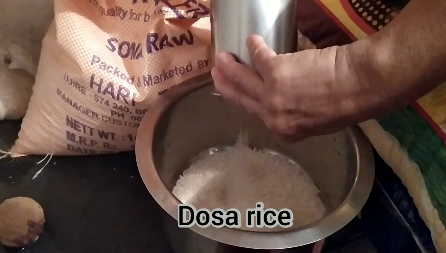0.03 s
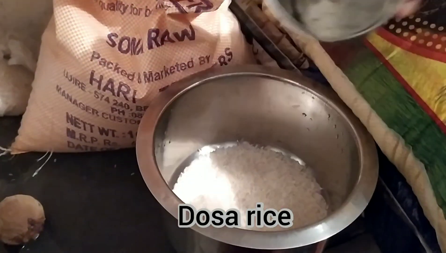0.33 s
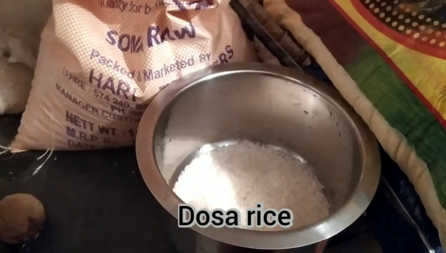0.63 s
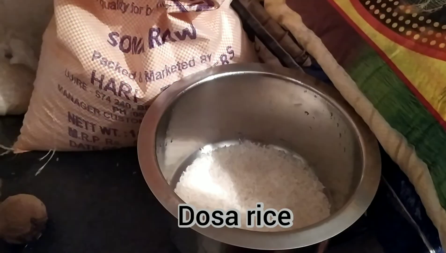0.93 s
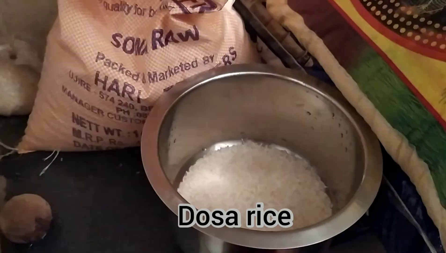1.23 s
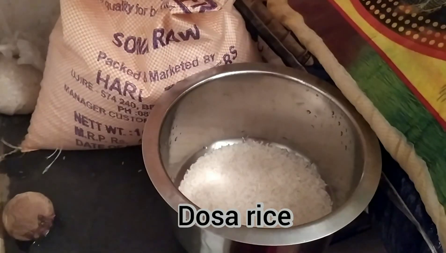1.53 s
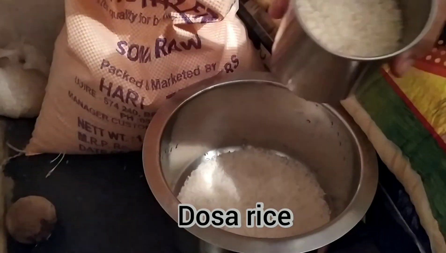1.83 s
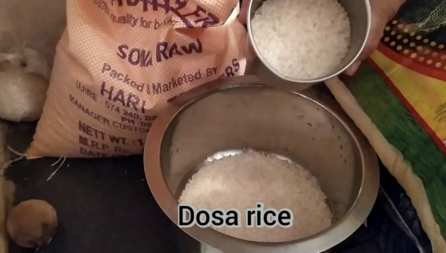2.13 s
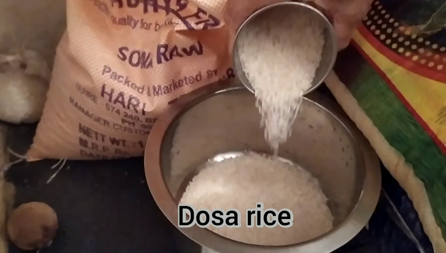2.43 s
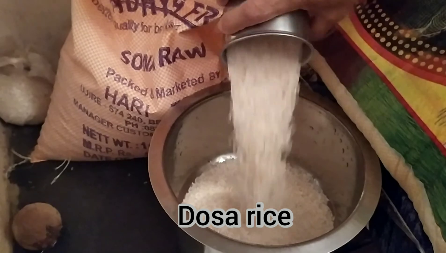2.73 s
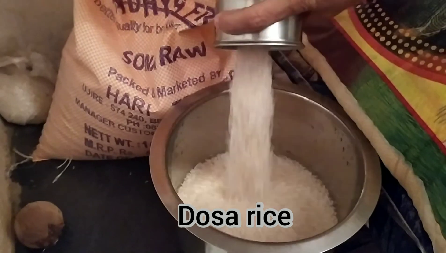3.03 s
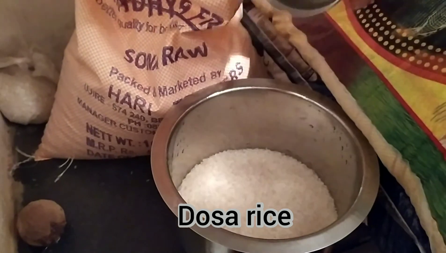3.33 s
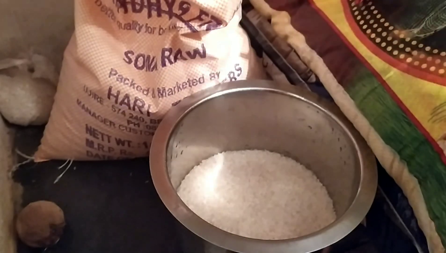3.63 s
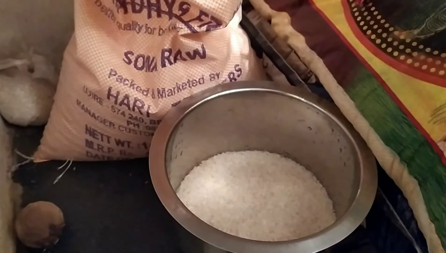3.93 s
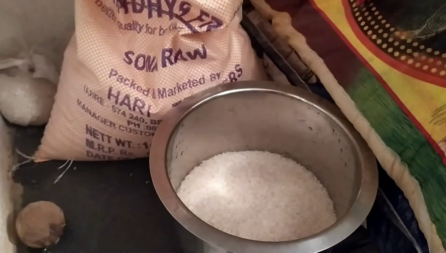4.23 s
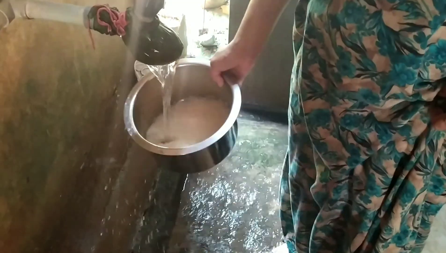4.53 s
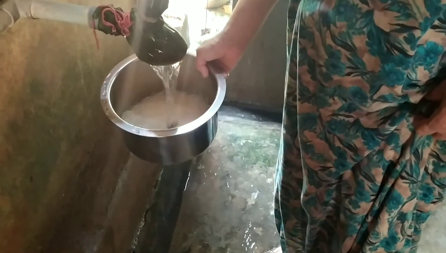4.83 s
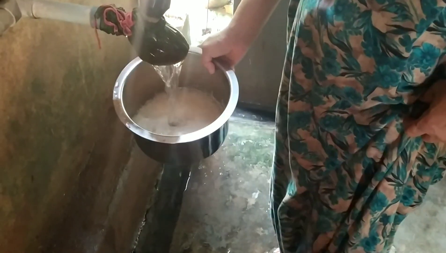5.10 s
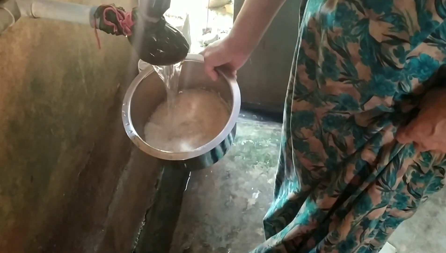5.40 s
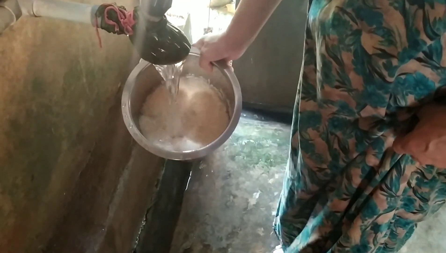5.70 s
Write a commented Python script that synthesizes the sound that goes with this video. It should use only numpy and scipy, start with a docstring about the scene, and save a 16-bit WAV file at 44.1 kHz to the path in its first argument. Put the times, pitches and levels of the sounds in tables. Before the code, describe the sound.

Two cupfuls of dry rice pour into a steel pot between a clank and scoops from a sack, before running water splashes and gurgles in.

```python
"""Rice into a steel pot

A steel cup pours raw rice into a steel pot: grains hiss on the heap and tinkle off the walls.
The cup clanks on the rim, crunches into a woven sack, pours a second cupful and digs again.
Cut to a washing place, where a tap splashes and gurgles onto the rice, about half a metre away."""
import sys
import numpy as np
from scipy import signal
from scipy.fft import rfft, irfft, next_fast_len
from scipy.io import wavfile

SR = 44100
rng = np.random.default_rng(int(sys.argv[2]) if len(sys.argv) > 2 else 0)


def inscribe(sig):
    """Save sig as 16-bit PCM at rate SR to the path in sys.argv[1].

    A 1-D sig is mono; a 2-D sig holds one channel per row.
    Samples are clipped to [-1, 1] before scaling.
    """
    pcm = np.round(np.clip(np.atleast_2d(sig).T, -1, 1) * 32767)
    wavfile.write(sys.argv[1], SR, pcm.astype(np.int16))


N = 258426
T = np.arange(N) / SR
CUT_S = 4.321  # cut to the washing place


# cupfuls: t/s when empty, hiss level/dB, patter level/dB, tinkle level/dB
CUPFULS = [(0.102, -31, -38, -31), (3.201, -30, -42, -23.5)]
# rice sliding in the lifted cup: t/s, rise/s, hold/s, level/dB
CUP_SLIDES = [(1.897, 0.0075, 0.065, -59), (2.185, 0.0093, 0.036, -59), (2.21, 0.048, 0.072, -47.5),
              (2.35, 0.024, 0.092, -54)]
# bright EQ of grains on the heap: f/Hz, level/dB
HISS_EQ = [(1500, -13.5), (3500, -20), (5500, -15), (7200, -1), (9500, 8.5), (12000, 2), (15500, 1)]
# hollow EQ of the pot: f/Hz, level/dB
PATTER_EQ = [(150, 4.5), (330, 0), (490, 8.5), (750, -8), (1300, -5.5), (2000, 2), (2800, 3.5),
             (4200, -13.5), (7000, -7.5), (15000, -79)]
def pour(peak_grains_per_s=7000):
    """Grains hiss on the heap and patter in the hollow pot; a stronger flow means more grains."""
    _, hiss_db, patter_db, _ = np.transpose(CUPFULS)
    flow = rice_flow(hiss_db, lead_s=0.26, arch_db=22.5, fall_db_s=236.5, slump_db=4)
    flow += swells(CUP_SLIDES, fall_db_s=125)
    rate = peak_grains_per_s * (flow / flow.max()) ** 0.66
    hiss = in_pot(colour(grains(rate, spread_db=1.5), HISS_EQ))
    patter = in_pot(colour(grains(rate, spread_db=0.5), PATTER_EQ))
    return hiss * flow + patter * rice_flow(patter_db, lead_s=0.26, arch_db=18.5, fall_db_s=143)


def rice_flow(levels_db, lead_s, arch_db, fall_db_s, slump_db=0, pour_s=.73, slump_s=.3275):
    """Each pour arches to a peak lead_s before the cup is empty, then the last grains settle."""
    gain = 0
    for (empty_s, *_), db in zip(CUPFULS, levels_db):
        t = np.clip(T - empty_s, -pour_s, 1)
        attack = np.minimum((t + pour_s) / 0.023, 1)
        arch = ((np.minimum(t, 0) + lead_s) / (pour_s - lead_s)) ** 2
        packed = 1 - np.clip((t + slump_s) / 0.022, 0, 1)  # falls to 0 as the packed rice lets go
        gain += attack * amp(db - arch_db * arch - slump_db * packed - fall_db_s * np.maximum(t, 0))
    return gain


# steel resonances struck by grains: f/Hz, width/Hz, level/dB
TINKLE_MODES = [(2180, 670, -26.5), (3640, 130, -16.5), (4840, 33, -3.5), (5500, 17, -5), (5930, 90, -10),
                (6260, 120, -6.5), (7040, 135, 1.5), (7430, 160, -0.5), (7735, 140, 3.5), (7970, 190, 2.5),
                (8950, 660, -5)]
# EQ of the fine sparkle on top: f/Hz, level/dB
JINGLE_EQ = [(2000, -16), (3000, -14.5), (4200, -11), (5200, -5), (7800, 9), (9000, -1), (12000, 1)]
def tinkle(jingle_db=-8, shift_db=2.9):
    """Grains bounce off cup and pot; each new landing spot brings out other resonances of the steel."""
    hits = grains(3500, spread_db=-1)
    levels_db = [row[3] for row in CUPFULS]
    flow = rice_flow(levels_db, lead_s=0.23, arch_db=27, fall_db_s=167, slump_db=11)
    flow += swells(CUP_SLIDES, fall_db_s=146) * amp(-1.5)
    ring = sum(amp(db + shift_db * walk(22.09)) * resonate(resonate(hits, hz, width), hz, 5 * width)
               for hz, width, db in TINKLE_MODES)
    sparkle = pings(0, CUPFULS[-1][0] + .4, 2000, 12000, cycles=260, glide=0, spread_db=.8, count=3200)
    jingle = unit(colour(sparkle, JINGLE_EQ))
    return (unit(ring) * amp(-1.3) + jingle * amp(jingle_db)) * flow * amp(1.1 * walk(60))


# ring of pot and cup: f/Hz, level/dB, t60/s, left minus right/dB, lag on the right/ms
STEEL_MODES = [(126, -20, .36, -2, .1), (724, -32, .45, 0, -.37), (949, -17.5, .53, -8, .4),
               (1814, -23.5, .85, -3, .19), (1868, -13, .7, 1, .19), (2289, -27, .36, 7, .3),
               (2422, -25, .35, 2, -.04), (2598, -31, .51, 1, .2), (3494, -17.5, .43, 4, .16),
               (4097, -31, .5, 3, .1), (4510, -21, .28, 4, -.03), (4547, -13.5, .22, 3, -.03),
               (4622, -24, .43, 6, -.04), (5160, -26, .42, 7, .08), (6550, -23, .33, 5, .3),
               (6690, -25, .38, 4, .2), (6860, -30, .45, 1, -.1), (7100, -24, .4, 11, .03),
               (7187, -14, .42, 5, .035), (7385, -21.5, .45, 3, .03), (7490, -25, .35, 4, .1),
               (7610, -18.5, .38, 8, -.015), (7891, -31, .4, 8, .2), (8550, -31, .53, 12, .1),
               (9240, -33, .4, 2, .2), (9410, -26.5, .38, 7, -.01), (11160, -37, .5, 2, .3)]
# chatter on the rim: t/s, ring level/dB, crack level/dB, tilt/(dB per octave)
RIM_HITS = [(0.9051, -1, -2.5, -0.5), (0.9126, -10, -14, 5), (.918, -6, -19, 3.5),
            (0.922, -11.5, -15.5, -3.5), (0.9346, -8, -16, 0), (0.944, -9, -19.5, 7),
            (0.946, -11, -29.5, -4.5)]
# EQ of the steel-on-steel crack: f/Hz, level/dB
CRACK_EQ = [(60, -26.5), (125, 8), (200, -9.5), (450, -3), (900, 2.5), (1400, -4), (2400, 8.5), (3300, -6),
            (4600, 5.5), (5600, -13), (7100, 12), (8200, -6.5), (9400, 4), (10400, -13), (11200, -8),
            (15000, -15)]
def clank(crack_t60=0.12, wash_db=-22.5, wash_t60=0.62, ring_db=-4, build_cycles=2.3):
    """The cup chatters on the rim: each contact cracks and feeds the steel modes. Gives (ring, crack)."""
    ring, t = np.zeros((2, N)), T[:int(.72 * SR)]
    first_s = RIM_HITS[0][0]
    for hz, db, t60, pan_db, lag_ms in STEEL_MODES:
        lag = np.array([[0], [lag_ms / 1000]])
        gain_db = db + ring_db + np.array([[pan_db], [-pan_db]]) / 2
        envelope = np.minimum(t * hz / build_cycles, 1) * decay(t, t60) * amp(gain_db)
        slips, detunes = rng.random(len(RIM_HITS)), rng.standard_normal(len(RIM_HITS))
        for (s, blow_db, _, tilt_db), slip, detune in zip(RIM_HITS, slips, detunes):
            # rebounds detune the high partials and land roughly in step with the ring
            pitch = hz + detune * (hz / 2800) ** 2 * (s > first_s)
            phase = hz * (s - first_s) + .55 * (slip - .5)
            strength = amp(blow_db + tilt_db * np.log2(max(hz, 1500) / 4000))
            add(ring, s, strength * envelope * np.sin(2 * np.pi * (pitch * (t - lag) + phase)))
    # a wash of weak modes lingers behind the cracks
    crowd = sum(np.sin(2 * np.pi * (hz * t + rng.random((2, 1)))) for hz in rng.uniform(2000, 12000, 120))
    wash = np.zeros((2, N))
    add(wash, first_s, crowd)
    wash = unit(colour(wash, CRACK_EQ)) * np.sqrt(len(t) / N) * amp(wash_db) * blow(first_s, wash_t60)
    crack_power = sum((amp(db) * blow(s, crack_t60)) ** 2 for s, _, db, _ in RIM_HITS)
    crack = unit(colour(grains(20000, spread_db=.8), CRACK_EQ))
    return ring, wash + crack * np.sqrt(crack_power)


# cup in the sack: start t/s, end t/s
SCOOP_SPANS = [(0.999, 1.627), (4.123, 4.321)]
# shoves through the rice: t/s, rise/s, hold/s, crunch level/dB, rumble level/dB
CUP_SHOVES = [(0.991, 0.0078, 0.049, -34, -40.5), (1.066, 0.027, 0.055, -42.5, -44.5),
              (1.163, 0.057, 0.028, -37.5, -43), (1.236, 0.014, 0.043, -58, -40),
              (1.29, 0.035, 0.11, -34.5, -39), (1.38, 0.045, 0.04, -33.5, -33),
              (1.472, 0.031, 0.048, -35.5, -37), (1.558, 0.031, 0.0081, -34.5, -33),
              (4.12, 0.0043, 0.026, -37, -41.5), (4.129, 0.037, 0.042, -24.5, -27.5),
              (4.242, 0.027, 0.036, -32.5, -33)]
# grains screeching along the cup on the hardest shoves: t/s, rise/s, hold/s, level/dB
CUP_SCREECHES = [(1.4, 0.055, 0.083, -44), (1.575, 0.012, 0.025, -41), (4.15, 0.011, .01, -35),
                 (4.196, 0.0073, 0.0085, -24)]
# gritty EQ of packed rice: f/Hz, level/dB
CRUNCH_EQ = [(300, -24), (600, 1.5), (900, 9.5), (1300, -0.5), (2500, 4.5), (5000, -3), (7500, 2.5),
             (10000, -3.5), (13000, -15), (15500, -18)]
# low body of the sack: f/Hz, level/dB
RUMBLE_EQ = [(40, -11.5), (90, -5), (150, 2), (300, -3.5), (480, -3.5), (700, -26.5), (1500, -31),
             (6000, -62)]
def dig():
    """Packed grains stick and slip against the cup; the mass of the sack rumbles with each shove."""
    push = swells([row[:4] for row in CUP_SHOVES], fall_db_s=246)
    heave = swells([(s, rise, hold, db) for s, rise, hold, _, db in CUP_SHOVES], fall_db_s=218)
    crunch = in_pot(colour(grains(4500, spread_db=-0.5), CRUNCH_EQ), wet_db=-5, t60=0.081) * amp(0.46)
    rumble = unit(colour(grains(1500, spread_db=-2), RUMBLE_EQ)) * amp(2.55)
    screech = in_pot(colour(grains(5000, spread_db=3), [(5000, -32), (9500, -6), (15000, -15.5)]))
    screech *= swells(CUP_SCREECHES, fall_db_s=248)
    in_sack = sum(during(*span) for span in SCOOP_SPANS)
    return (crunch * push + rumble * heave + screech) * amp(0.96 * walk(110)) * in_sack


# blunt bumps: t/s, crunch level/dB, thud level/dB
CUP_KNOCKS = [(1.05, -28.5, -23), (1.127, -32, -28.5), (1.245, -22, -19.5), (1.524, -27.5, -51),
              (3.836, -57, -48), (4.039, -48.5, -37.5), (4.202, -25, -29)]
def knocks(thud_hz=122, thud_t60=0.18, crunch_t60=0.056):
    """The cup bumps into the rice: a short crunch over a low thud."""
    crunch = unit(colour(grains(9000, spread_db=2.5), CRUNCH_EQ))
    out = np.zeros((2, N))
    for s, crunch_db, thud_db in CUP_KNOCKS:
        thud = np.sin(2 * np.pi * thud_hz * (T - s)) * blow(s, thud_t60, rise=0.0039)
        out += amp(crunch_db) * crunch * blow(s, crunch_t60) + amp(thud_db) * thud
    return out


# EQ of water on wet rice: f/Hz, level/dB
SPLASH_EQ = [(200, -22.5), (800, -27), (1200, -18.5), (2600, -6.5), (3800, -12), (5000, -9.5), (6900, 0),
             (7900, -1), (8800, -3.5), (11300, -6), (13000, -13), (15500, -17)]
# slaps into the pooling water: t/s, rise/s, hold/s, level/dB
WATER_SLAPS = [(4.448, 0.0056, 0.032, -38.5), (4.88, 0.037, 0.18, -57), (5.35, 0.036, 0.12, -57),
               (5.63, 0.0096, 0.27, -53)]
# spurts of droplets: t/s, level/dB
WATER_SPITS = [(4.359, -37), (4.489, -26), (4.67, -34.5), (4.963, -47), (5.152, -43), (5.254, -39.5),
               (5.333, -40.5), (5.494, -38), (5.547, -38.5), (5.558, -38), (5.691, -37.5), (5.717, -35)]
# clusters of big bubbles: t/s, rise/s, hold/s, level/dB
WATER_BURBLES = [(4.59, 0.028, 0.076, -58), (4.85, 0.015, 0.12, -60.5), (5.05, 0.023, 0.018, -59),
                 (5.32, 0.019, 0.14, -54.5), (5.48, .02, 0.15, -59), (5.68, .02, 0.39, -55)]
# solo drops and bubbles: t/s, level/dB, f/Hz, ring/cycles
WATER_DROPS = [(4.3297, -10.5, 8600, 24), (4.34, -11.5, 7400, 24), (4.348, -19, 7950, 54),
               (4.361, -15, 8500, 53), (4.4295, -16.5, 7600, 60), (4.453, -21, 2660, 150),
               (4.467, -29, 3080, 28), (4.495, -25, 2840, 60), (4.783, -27, 6750, 180),
               (5.061, -41, 1530, 74), (5.356, -40, 1030, 35), (5.394, -43, 880, 30),
               (5.634, -46, 1150, 120), (5.78, -41, 1210, 115)]
def tap(splash_db=-45.5, bare_rice_db=14.5, pooling_s=0.43, fizz_db=-56.5, pot_air_hz=1195, glide=0.19):
    """The stream hits bare rice until pooling water cushions it, spitting and whipping up bubbles."""
    slaps = swells(WATER_SLAPS, fall_db_s=145)
    bare = np.exp(-np.maximum(T - CUT_S, 0) / pooling_s)
    splash = np.hypot(amp(splash_db + bare_rice_db * bare), slaps * amp(7))
    droplets = unit(colour(grains(12000, spread_db=2.6), SPLASH_EQ))
    small = pings(CUT_S, T[-1], 4000, 9000, cycles=55, glide=glide, spread_db=3, count=700)
    medium = pings(CUT_S, T[-1], 1900, 3500, cycles=50, glide=glide, spread_db=3, count=450)
    large = pings(CUT_S, T[-1], 900, 1600, cycles=28, glide=glide, spread_db=1.2, count=450)
    large = large * amp(-2.5) + resonate(large, pot_air_hz, 94) * amp(-10)  # the pot's air rings along
    spray = unit(churn(droplets)) * amp(0.77 + 0.19 * walk(42))
    spits = droplets * swells([(s, .002, .003, db) for s, db in WATER_SPITS], fall_db_s=1500)
    fizz = medium * np.hypot(amp(fizz_db), slaps)
    burble = large * swells(WATER_BURBLES, fall_db_s=130)
    out = (spray + small * amp(-12)) * splash + spits + fizz + burble + gurgle()
    for s, db, hz, cycles in WATER_DROPS:
        add(out, s, np.outer([.95, .7], ping(hz, cycles, glide=0.12)) * amp(db))
    return out * during(CUT_S + 0.0056, 6)


def churn(x, depth_db=3, rate=26):
    """The splash crater keeps changing shape, so each narrow band swells on its own; a 2 s loop."""
    size = next_fast_len(2 * SR)
    spectrum, out = rfft(x, size), 0
    position = np.log2(np.clip(np.fft.rfftfreq(size, 1 / SR), 500, 16000) / 500) * 5  # 5 bands an octave
    for band in range(26):
        band_sound = irfft(spectrum * np.maximum(1 - abs(position - band), 0), size)
        out += band_sound * amp(depth_db * walk(rate)[:size])
    return out[:, np.arange(N) % size]


# voice of the hollow that the stream digs: t/s, f/Hz, level/dB
GURGLE_PATH = [(4.33, 340, -62), (4.45, 340, -48), (4.6, 350, -67), (4.72, 510, -59), (4.96, 510, -63),
               (5.02, 505, -50), (5.15, 490, -57.5), (5.29, 470, -57.5), (5.35, 470, -51), (5.55, 455, -55),
               (5.65, 390, -47), (5.76, 440, -52), (5.86, 410, -48)]
def gurgle(trim_db=-4):
    """Air trapped under the stream throbs without a break around the pitch of the hollow."""
    times, hz, db = np.transpose(GURGLE_PATH)
    phase = 2 * np.pi * np.cumsum(np.interp(T, times, hz)) / SR
    throb = sum(walk(rate) * np.sin(phase) + walk(rate) * np.cos(phase) for rate in (120, 250))
    return throb * amp(np.interp(T, times, db) + trim_db)


# brushes against the sack: t/s, rise/s, hold/s, level/dB
SACK_BRUSHES = [(.635, 0.054, 0.014, -54.5), (1.635, 0.024, 0.011, -52.5), (1.899, 0.0047, 0.14, -56.5),
                (2.07, 0.024, 0.35, -62.5), (3.54, 0.041, .015, -56.5), (3.64, 0.017, .03, -65.5),
                (3.81, 0.0095, 0.014, -62), (3.885, 0.016, .02, -63.5), (4.032, 0.026, 0.012, -46)]
def rustle():
    """Light contact with the woven sack makes a dry whisper."""
    weave_eq = [(200, -3.5), (1000, -5), (2800, 2), (5000, -4), (8000, 3), (15500, -12)]
    return unit(colour(grains(4000, spread_db=-1.1), weave_eq)) * swells(SACK_BRUSHES, fall_db_s=143.5)


# late grains: t/s, level/dB, f/Hz
STRAY_GRAINS = [(.495, -54, 9500), (3.386, -52, 2760)]
def strays():
    """Lone grains tick against the steel after a pour."""
    out = np.zeros((2, N))
    for s, db, hz in STRAY_GRAINS:
        add(out, s, ping(hz, cycles=60, glide=0)[None] * amp(db))
    return out


def cup_tick(s=2.327, db=-54):
    """A soft, dull tick as the full cup tips over the pot."""
    dull_eq = [(600, -14), (1100, -4), (1500, 3), (2400, -2), (3500, -11), (8000, -33)]
    return unit(colour(grains(9000, spread_db=-9), dull_eq)) * swells([(s, .007, .006, db)], fall_db_s=700)


# EQ of the room tone: f/Hz, level/dB
AIR_EQ = [(25, -12.5), (55, -2), (100, -14.5), (160, -14.5), (260, -10.5), (500, -19.5), (1000, -23),
          (3000, -29), (8000, -28), (15500, -33.5)]
def background():
    """A bed of room air with a low electric drone; the washing place has a fainter hum."""
    air = unit(colour(grains(29000, spread_db=1.5), AIR_EQ))
    drone = amp(-55 + .5 * walk(6.8)) * np.sin(2 * np.pi * 52.5 * T + np.array([[0], [.7]]))
    hum = amp(np.interp(T, [5.2, 5.5], [-64, -71]) + walk(4.6)) * np.sin(2 * np.pi * 101 * T)
    return (amp(-62.5) * air + drone) * during(-.004, CUT_S) + (amp(-66.5) * air + hum) * during(CUT_S, 6)


def in_pot(x, wet_db=1, t60=0.15):
    """Echoes between close steel walls carve fine peaks and dips into the treble; rms 1."""
    t = T[:SR // 10]
    echoes = rng.standard_normal((2, len(t))) * decay(t, t60) * (t > .0006)
    echoes = signal.sosfilt(signal.butter(2, 1500, "high", fs=SR, output="sos"), echoes)
    echoes *= amp(wet_db) / np.sqrt(np.sum(echoes ** 2, axis=1, keepdims=True))
    return unit(x + signal.oaconvolve(x, echoes, axes=1)[:, :N])


def room(x, wet_db=-13, t60=0.13):
    """Short diffuse reflections from the pot and the walls."""
    t = T[:SR // 3]
    tail = rng.standard_normal((2, len(t))) * decay(t, t60) * (t > .002)
    tail /= np.sqrt(np.sum(tail ** 2, axis=1, keepdims=True))
    return x + amp(wet_db) * signal.oaconvolve(x, tail, axes=1)[:, :N]


def grains(rate, spread_db):
    """Tiny impacts of uneven size at steady power, each with its own left-right lag."""
    chance = rng.random(N)
    size = np.minimum(rng.exponential(size=N), 5)
    sign = rng.choice([-1, 1], N)
    lag = rng.integers(-17, 18, N)
    density = np.clip(rate / SR, 1e-4, 1)
    left = (chance < density) * sign * amp(spread_db * size) / np.sqrt(density)
    right = np.bincount((np.arange(N) + lag) % N, left, N)
    return unit(np.array([left, right]))


def ping(hz, cycles, glide):
    """A dying sine; an upward glide makes it a bubble."""
    u = np.linspace(0, 1, int(cycles * SR / hz) + 2)
    return np.sin(2 * np.pi * cycles * (u + glide * u * u / 2)) * np.exp(-np.log(100) * u)


def pings(start, end, low_hz, high_hz, cycles, glide, spread_db, count):
    """A cloud of pings of mixed pitch, size and pan, rms 1 between two times."""
    out = np.zeros((2, N))
    for when, pitch, size, side, lag in rng.random((count, 5)):
        hz = low_hz * (high_hz / low_hz) ** pitch
        ring = ping(hz, cycles, glide)[None] * amp(spread_db * min(-np.log(size), 4))
        s = start + when * (end - start)
        add(out[:1], s, np.sqrt(side) * ring)
        add(out[1:], abs(s + (lag - .5) / 1200), np.sqrt(1 - side) * ring)
    return unit(out) * np.sqrt((end - start) / T[-1])


def swells(rows, fall_db_s):
    """Envelope of a series of gestures: each rises, holds, then dies away."""
    power, t = np.zeros((1, N)), T[:SR]
    for s, rise, hold, db in rows:
        gain = np.minimum(t / rise, 1) * amp(db - fall_db_s * np.maximum(t - rise - hold, 0))
        add(power, s, gain[None] ** 2)
    return np.sqrt(power[0])


def blow(s, t60, rise=0.0022):
    """Envelope of a hit at time s."""
    out, age = np.zeros((1, N)), T[:SR]
    add(out, s, (np.minimum(age / rise, 1) * decay(age, t60))[None])
    return out[0]


def decay(t, t60):
    """A tail that falls 60 dB in t60 seconds."""
    return np.exp(-np.log(1000) * t / t60)


def during(start, end):
    """A soft-edged gate between two times."""
    return np.clip((T - start) / .004, 0, 1) * np.clip((end - T) / .004, 0, 1)


def walk(rate):
    """Smooth random wander with a spread near 1."""
    return np.interp(T * rate, np.arange(4096), rng.standard_normal(4096)) * np.sqrt(1.5)


def colour(x, points, size=4096):
    """Minimum-phase EQ through (f/Hz, level/dB) points."""
    hz, db = np.transpose(points)
    f = np.maximum(np.fft.rfftfreq(size, 1 / SR), 1)
    cepstrum = irfft(np.log(amp(np.interp(np.log(f), np.log(hz), db))))
    cepstrum[1:size // 2] *= 2
    cepstrum[size // 2 + 1:] = 0
    return signal.oaconvolve(x, irfft(np.exp(rfft(cepstrum)))[None], axes=1)[:, :N]


def resonate(x, hz, width):
    """One resonance, gain 1 at its centre."""
    return signal.lfilter(*signal.iirpeak(hz, hz / width, fs=SR), x)


def add(out, s, x):
    """Mix a short sound in at time s."""
    i = int(s * SR)
    out[:, i:i + x.shape[1]] += x[:, :max(N - i, 0)]


def unit(x):
    """Scale a stereo sound so that its mid has rms 1."""
    return x / np.sqrt(np.mean(x.mean(0) ** 2))


def amp(db):
    """Decibels to gain."""
    return np.exp(np.asarray(db) * (np.log(10) / 20))


def scene():
    """The stereo mix; the left side faces the pot and gets more treble."""
    ring, crack = clank()
    near = room(pour() + tinkle() + strays() + cup_tick() + crack + rustle() + tap()) + dig() + knocks()
    left_eq = [(300, -6), (1100, -4.5), (2400, -1.5), (4500, 1.6), (7800, 2), (13000, 1.5)]
    right_eq = [(300, -5.5), (1100, -3.1), (2400, -5.5), (4500, -1.4), (7800, -4), (13000, 1)]
    return np.vstack([colour(near[:1], left_eq), colour(near[1:], right_eq)]) + ring + background()


def record(dry, low_hz=36, top_hz=15900):
    """Roll off the deepest bass, round the loudest peaks and cut the top."""
    dry = signal.sosfilt(signal.butter(4, low_hz, "high", fs=SR, output="sos"), dry)
    return signal.sosfilt(signal.ellip(12, .2, 90, top_hz, fs=SR, output="sos"), np.tanh(dry))


dry = scene()
out = record(dry)
inscribe(out)
```